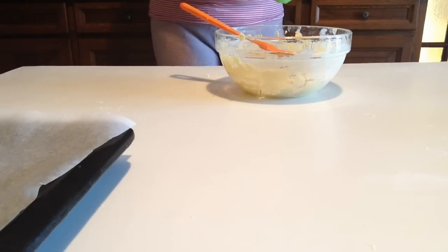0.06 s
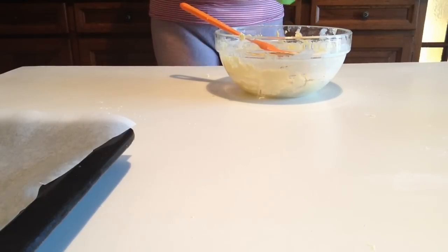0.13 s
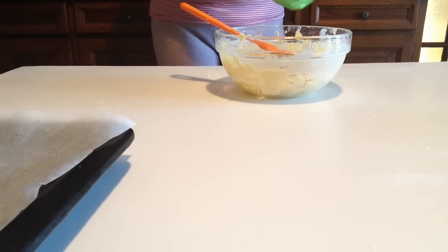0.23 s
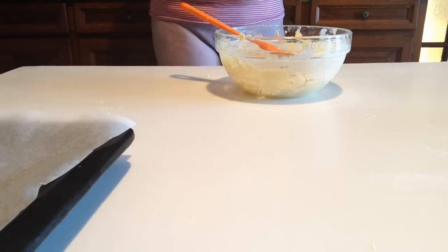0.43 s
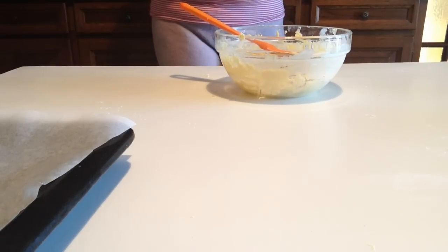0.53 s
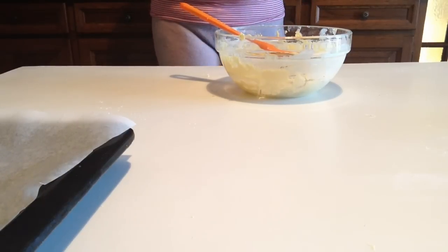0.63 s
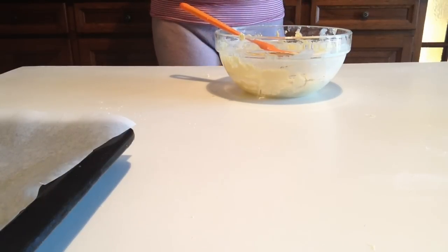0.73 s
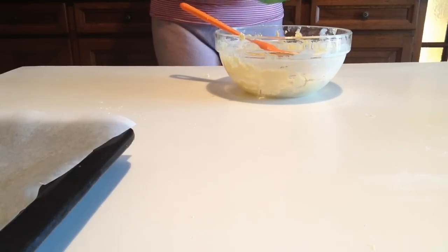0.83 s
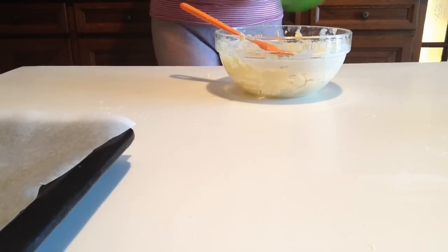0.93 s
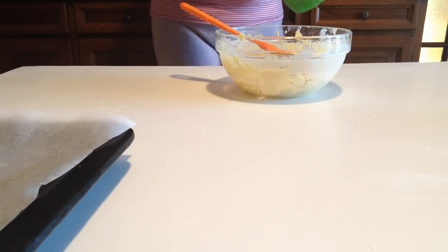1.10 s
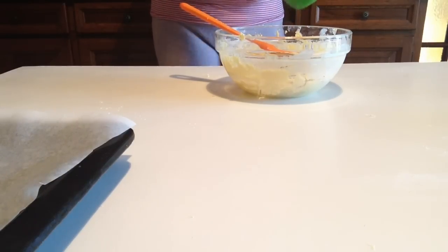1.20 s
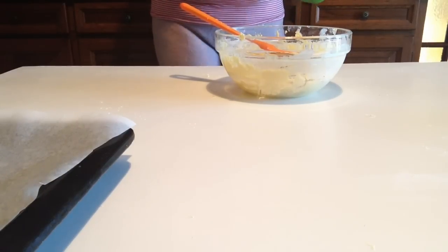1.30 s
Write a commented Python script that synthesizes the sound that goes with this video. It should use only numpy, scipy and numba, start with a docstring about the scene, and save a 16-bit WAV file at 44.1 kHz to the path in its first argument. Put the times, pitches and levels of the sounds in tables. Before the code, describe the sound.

A thin plastic piping bag crinkles as it is folded over, faint ticks first, then a dense burst of crackles and snaps, thinning to sparse clicks; hard-walled kitchen, microphone a couple of metres away.

```python
"""Creases buckle as a thin plastic piping bag is folded over, a couple of metres from the microphone.
Many tiny random cracks and some louder snaps each ring patches of film for a few cycles.
Air-filled folds pop hollowly, each a single low ring.
The hard-walled kitchen answers after a short gap with a bright tail, over a faint hiss."""
import sys
import numpy as np
from scipy import signal
from scipy.fft import rfft, irfft, next_fast_len
from scipy.io import wavfile
from numba import njit

SR = 44100
rng = np.random.default_rng(int(sys.argv[2]) if len(sys.argv) > 2 else 0)


def attenuation_scalar(level_db):
    """Turn a level in dB into a linear amplitude multiplier (20 dB per decade)."""
    decades = np.asarray(level_db, float) / 20
    return 10 ** decades


def inscribe(sig):
    """Save sig as 16-bit PCM at rate SR to the path in sys.argv[1].

    A 1-D sig is mono; a 2-D sig holds one channel per row.
    Samples are clipped to [-1, 1] before scaling.
    """
    pcm = np.round(np.clip(np.atleast_2d(sig).T, -1, 1) * 32767)
    wavfile.write(sys.argv[1], SR, pcm.astype(np.int16))


N = 59535  # samples, 1.35 s
RISE = 5.6  # a ring rises this many times faster than it falls
TOP_HZ = 15100  # upper limit of the snaps' fizz and of the recorded treble


def at(table, hz, column=1):
    """Reads a column of a table on a log-frequency axis."""
    table = np.array(table, float)
    return np.interp(np.log(hz), np.log(table[:, 0]), table[:, column])


def colour(x, db):
    """Weights each frequency by db(Hz)."""
    n = next_fast_len(len(x))
    hz = np.maximum(np.arange(n // 2 + 1) * SR / n, 1.)
    return irfft(rfft(x, n) * attenuation_scalar(db(hz)), n)[:len(x)]


@njit
def rings(start_s, hz, cycles, size, rise, out_len):
    """Damped sines with a soft start: each decay falls 60 dB in the given number of cycles."""
    out = np.zeros(out_len)
    for k in range(len(start_s)):
        first = int(start_s[k] * SR)
        last = min(out_len, first + int(cycles[k] / hz[k] * SR) + 2)
        fall = np.log(1000.) / cycles[k] * hz[k] / SR
        turn = np.exp(2j * np.pi * hz[k] / SR - fall)
        settle = np.exp(-rise * fall)
        z, onset = size[k] + 0j, 1.
        for j in range(max(first, 0), last):
            out[j] += z.real * (1 - onset)
            z *= turn
            onset *= settle
    return out


# Colour of the faint hiss: pitch_hz [Hz], level_db [relative dB per Hz]
HISS_COLOUR = [(18, -72), (30, -36), (364, 15), (1630, -37), (4190, -8), (13000, -6), (14800, -20),
               (16000, -43)]


def faint_hiss():
    """Steady random noise, coloured and set to a fixed RMS level."""
    hiss = colour(rng.standard_normal(N), lambda f: at(HISS_COLOUR, f))
    return attenuation_scalar(-61) * hiss / hiss.std()


# How the kitchen rings on, by pitch: pitch_hz [Hz], t60_s [s to fall 60 dB], level_db [relative dB]
ROOM_BANDS = [(150, 0.24, -6.5), (600, 0.4, -4.5), (1950, 0.59, -1), (4300, 0.33, -3), (9500, 0.15, -1),
              (14900, 0.17, 0)]
ROOM_GAP_S, ROOM_RISE_S, ROOM_DB = 0.0011, 0.01, 3
SPOTS, SPOT_S = 6, .03


def kitchen(x):
    """Diffuse tail after a gap, each band with its own decay; the sound hops between spots with own tails."""
    t = np.arange(int(.6 * SR)) / SR
    late = np.maximum(t - ROOM_GAP_S, 0)
    build_up = 1 - np.exp(-late / ROOM_RISE_S)
    hop = np.arange(N) / SR / SPOT_S
    out = 0
    for spot in range(SPOTS):
        tail = 0
        for hz in 125 * 2. ** np.arange(0, 7.5, .5):
            band = colour(rng.standard_normal(len(t)), lambda f: -12 * (2 * np.log2(f / hz)) ** 2)
            t60 = at(ROOM_BANDS, hz)
            decay = attenuation_scalar(at(ROOM_BANDS, hz, column=2) - 60 * late / t60)
            # the root keeps long and short decays equal in energy
            tail = tail + band * decay * np.sqrt(2 * np.log(1000) / t60 / SR)
        # neighbouring spots crossfade at constant power
        share = np.cos(np.pi / 2 * np.clip((hop - spot) % SPOTS - 1, -1, 1))
        out = out + signal.fftconvolve(x * share, tail * build_up)[:N]
    return attenuation_scalar(ROOM_DB) * out


# Hollow pops of the air-filled folds: start_s [s, before the lag], level_db [relative dB], pitch_hz [Hz]
FOLD_POPS = [(0.051, -37.5, 950), (0.073, -34, 1030), (0.084, -35, 770), (0.103, -39, 1270),
             (0.162, -33, 764), (0.184, -56, 700), (0.193, -35, 357), (0.205, -23, 746),
             (0.296, -21.5, 800), (0.302, -26, 870), (0.31, -25.5, 1330), (0.339, -14.5, 1150),
             (0.351, -13.5, 1540), (0.397, -18, 823), (0.414, -15.5, 970), (0.437, -19, 1240),
             (0.479, -13.5, 1170), (0.508, -15.5, 1250), (0.528, -20, 1220), (0.553, -29, 1370),
             (0.596, -25, 1400), (0.659, -20.5, 910), (0.759, -25.5, 1220), (0.787, -21, 1270),
             (0.826, -24, 790), (0.929, -22, 1065), (1.111, -28.5, 1140), (1.126, -34, 1510),
             (1.146, -32, 1370), (1.156, -31, 920), (1.206, -45, 736), (1.235, -35.5, 1310),
             (1.291, -35.5, 494)]
POP_CYCLES, POP_DB, POP_LAG_S = 15.3, -2.5, 0.001013


def pops():
    """Each air-filled fold sounds as one low damped ring."""
    start_s, level_db, pitch_hz = np.array(FOLD_POPS, float).T
    cycles = np.full(len(start_s), POP_CYCLES)
    return rings(start_s + POP_LAG_S, pitch_hz, cycles, attenuation_scalar(level_db + POP_DB), RISE, N)


# Strength of the crackle as the bag is handled, interpolated between times: time_s [s],
# level_db [relative dB, 2.5-7 kHz], bass_db and treble_db [dB re level_db, each used about its own mean]
HANDLING_STRENGTH = [(0, -41.5, -15, -16), (0.039, -57.5, 0, -3), (.1, -52, -2.5, -14), (.15, -68.5, 0, 7),
                     (0.204, -41, -0.5, -11), (0.209, -37, -6.5, 7), (.22, -43, -5, -9),
                     (.26, -38.5, -7, -9), (.3, -39.5, -1.5, -1), (.338, -40, -3.5, 1),
                     (0.338, -32.5, -4.5, -17), (.39, -34, -1, 3.5), (.45, -29, -8.5, -2),
                     (.51, -24.5, -8.5, -1), (.57, -27.5, -11, 0), (.62, -29, -8.5, 1.5),
                     (.665, -36.5, -2.5, -19), (.69, -43, -10.5, 10), (.78, -40.5, -8.5, -4),
                     (.85, -39, -7, -4), (0.941, -34, -10, -3.5), (1.027, -42, -3.5, -7),
                     (1.071, -52.5, -8.5, -2), (1.15, -51, -18, -19), (1.2, -52.5, -10, -20),
                     (1.28, -62, 0, 5), (1.35, -66, -1, 13)]
# Colour of the film's crackle: pitch_hz [Hz], level_db [relative dB per Hz]
FILM_COLOUR = [(59, -61), (100, -8), (156, -6), (452, -1), (1230, -3.5), (1910, -7.5), (4470, -6.5),
               (14100, -23), (15000, -32), (16000, -43)]
CRACKS_PER_S, PATCHES, CRACK_CYCLES = 4000, 3, 10.8
CRACK_SPREAD_DB, PATCH_SPREAD_DB, FLUTTER_DB, CRACKLE_DB = 1.8, 1.5, 1.5, -4
BURST_FADE_DB = -4  # each cluster starts suddenly and its cracks weaken by this much


def crackle():
    """Random cracks in fluttering clusters; each rings a few film patches of random pitch."""
    n = int(CRACKS_PER_S * N / SR)
    crack_s, strength = rng.random(n) * N / SR, rng.exponential(1, n)
    pitch_draw, delay_draw = rng.random((2, n, PATCHES))
    patch_draw = rng.standard_normal((n, PATCHES))
    hz = 120 * (16000 / 120) ** (pitch_draw ** .6)

    time_s, level_db, bass_db, treble_db = np.array(HANDLING_STRENGTH, float).T
    bass = np.interp(crack_s, time_s, bass_db - bass_db.mean())[:, None]
    treble = np.interp(crack_s, time_s, treble_db - treble_db.mean())[:, None]
    bass_share = np.clip(np.log(2500) - np.log(hz), 0, 1)
    treble_share = np.clip((np.log(hz) - np.log(6000)) * 2, 0, 1)
    tilt = bass_share * bass + treble_share * treble

    edge = np.r_[0, np.sort(rng.random(140)) * N / SR, N / SR]
    cluster = np.searchsorted(edge, crack_s) - 1
    progress = (crack_s - edge[cluster]) / np.diff(edge)[cluster]
    flutter = FLUTTER_DB * rng.standard_normal(len(edge))[cluster] + BURST_FADE_DB * progress

    handling_db = np.interp(crack_s, time_s, level_db)
    crack_db = (handling_db + flutter + CRACK_SPREAD_DB * strength)[:, None]
    patch_db = crack_db + tilt + PATCH_SPREAD_DB * patch_draw
    # the last factors allow for ring length and for the uneven spread of pitches
    size = attenuation_scalar(patch_db + at(FILM_COLOUR, hz)) * hz / pitch_draw ** .2 * np.sign(patch_draw)
    start = crack_s[:, None] + .0005 * delay_draw
    cycles = np.full(hz.size, CRACK_CYCLES)
    out = rings(start.ravel(), hz.ravel(), cycles, size.ravel(), RISE, N)

    # level is set on the 2.5-7 kHz band
    band = colour(out, lambda f: np.where((f > 2500) & (f < 7000), 0, -99))
    target = np.sqrt(np.mean(attenuation_scalar(handling_db) ** 2))
    return out * attenuation_scalar(CRACKLE_DB) * target / band.std()


# Louder snaps of single creases: start_s [s, before the lag], level_db [relative dB, main ring],
# pitch_hz [Hz, main ring], fizz_db [relative dB, treble], length_s [s, span of the steps]
CREASE_SNAPS = [(0.0508, -33, 3400, -53, 0.0016), (0.082, -33.5, 2940, -49, 0.0021),
                (0.118, -42, 3560, -61, 0.0024), (0.1314, -42, 4420, -47, 0.0019),
                (0.1855, -30.5, 4900, -58, 0.0015), (0.2032, -29, 4900, -52, 0.0028),
                (0.2065, -16, 5000, -30, 0.0025), (0.2092, -24, 3280, -45, 0.0018),
                (0.2354, -20.5, 4100, -37, 0.0025), (0.2448, -20.5, 4440, -38, 0.0013),
                (0.249, -19.5, 4300, -36, 0.0022), (0.2638, -24, 4050, -44, 0.00064),
                (0.269, -16.5, 3420, -27, 0.0014), (0.31, -42, 3180, -41, 0.0023),
                (0.326, -15.5, 3200, -34, 0.0027), (0.3395, -10.5, 4700, -22, 0.003),
                (0.3447, -18, 3060, -35, 0.0013), (0.36, -13.5, 2970, -40, 0.0022),
                (0.404, -12, 5540, -23, 0.0022), (0.444, -22, 4020, -24, 0.0024),
                (0.492, -13.5, 2430, -37, 0.0019), (0.5088, -13, 3800, -35, 0.0027),
                (0.5116, -14, 2540, -18, 0.0014), (0.5338, -11, 4660, -43, 0.0018),
                (0.569, -16, 4570, -35, 0.0028), (0.5938, -26, 3330, -24, 0.0013),
                (0.5965, -15, 5450, -46, 0.0018), (0.6124, -13, 5350, -49, 0.0024),
                (0.6233, -22, 5230, -22, 0.0025), (0.6263, -7.5, 5200, -24, 0.0018),
                (0.6338, -10.5, 5100, -43, 0.0013), (0.6555, -13, 4560, -19.5, 0.0018),
                (0.6603, -13.5, 3700, -24, 0.002), (0.6639, -10, 4170, -25.5, 0.002),
                (0.704, -27, 2940, -41, 0.0024), (0.713, -14, 4500, -28, 0.002),
                (0.7608, -25, 3220, -24.5, 0.0018), (0.771, -23, 6040, -34, 0.0019),
                (0.7906, -23, 3300, -31, 0.0015), (0.8258, -16, 3830, -34, 0.0014),
                (0.862, -20, 4500, -35, 0.0018), (0.866, -33, 3440, -31, 0.0036),
                (0.887, -19.5, 4700, -26, 0.0032), (0.8984, -23, 4350, -25, 0.0015),
                (0.927, -17, 3880, -30, 0.0019), (0.939, -16, 4930, -42, 0.0011),
                (0.9428, -30, 4790, -25, 0.0018), (0.9565, -28, 3490, -37, 0.0021),
                (0.965, -28, 4800, -31, 0.0017), (0.993, -15, 2960, -39, 0.0017),
                (1.0047, -23, 3470, -36, 0.0023), (1.0099, -18.5, 4600, -43, 0.0015),
                (1.109, -25, 4130, -42.5, 0.0023), (1.1564, -36, 3370, -56, 0.0019),
                (1.1654, -32, 4500, -39.5, 0.0018), (1.2067, -19, 5330, -34, 0.003),
                (1.2074, -30.5, 2230, -44, 0.0023), (1.2903, -17.5, 4000, -49, 0.00305)]
STEPS, SNAP_CYCLES, WALL_CYCLES, WALL_DB = 5, 8.9, 4, 9.5
SNAP_DB, SNAP_FADE_DB, SNAP_DETUNE, SNAP_LAG_S = -1, -11.5, 0.17, .001
FIZZ_CYCLES, FIZZ_DB, FIZZ_LOW_HZ = 7.8, 7, 7370


def snaps(steps, cycles, fizz_cycles, first_db):
    """A crease gives way in quick, fading steps; each rings a mid patch, a lower and an upper treble patch."""
    start_s, level_db, pitch_hz, fizz_db, length_s = np.array(CREASE_SNAPS, float).T[:, :, None]
    draw = rng.random((len(start_s), 4, steps))
    detune = rng.standard_normal((len(start_s), steps))
    index = np.arange(steps)
    step = (index + draw[:, 0] * (index > 0)) / steps  # 0 to 1 through the snap
    start = (start_s + SNAP_LAG_S + step * length_s).ravel()
    fade = SNAP_FADE_DB * step + first_db * (step == 0)

    pitch = pitch_hz * np.exp(SNAP_DETUNE * detune * (step > 0))
    size = attenuation_scalar(level_db + SNAP_DB + fade) * np.sign(draw[:, 3] - .5)
    out = rings(start, pitch.ravel(), cycles + 0 * start, size.ravel(), RISE, N)
    for half in (0, 1):  # lower, then upper treble patch
        pitch = FIZZ_LOW_HZ + (TOP_HZ - FIZZ_LOW_HZ) * (half + draw[:, half + 1]) / 2
        size = attenuation_scalar(fizz_db + FIZZ_DB + fade) * np.sign(detune)
        out = out + rings(start, pitch.ravel(), fizz_cycles + 0 * start, size.ravel(), RISE, N)
    return out


def scene():
    """The bag heard directly, the kitchen's answer and the hiss."""
    rest = crackle() + pops()
    bag = rest + snaps(STEPS, SNAP_CYCLES, FIZZ_CYCLES, first_db=1.5)
    # the walls are fed a simpler snap: one step of short, broad rings, giving a smooth tail
    around = rest + snaps(1, WALL_CYCLES, WALL_CYCLES, first_db=WALL_DB)
    return (bag + kitchen(around) + faint_hiss())[None]


def roll_off(x):
    """The treble ends steeply here."""
    return signal.sosfilt(signal.butter(12, 16360, fs=SR, output="sos"), x)


def record(dry):
    """The microphone cuts the bass steeply, all but a trace; then the treble ends abruptly at the top."""
    bass_cut = signal.butter(7, 162, "high", fs=SR, output="sos")
    top_cut = signal.ellip(6, .2, 35, TOP_HZ, fs=SR, output="sos")
    x = signal.sosfilt(bass_cut, dry) + attenuation_scalar(-22.5) * dry
    mix = signal.sosfilt(top_cut, x)
    return roll_off(mix)


dry = scene()
out = record(dry)
inscribe(out)
```